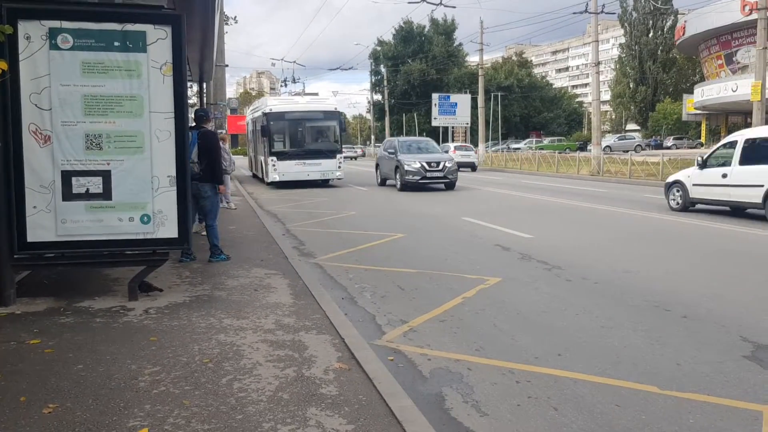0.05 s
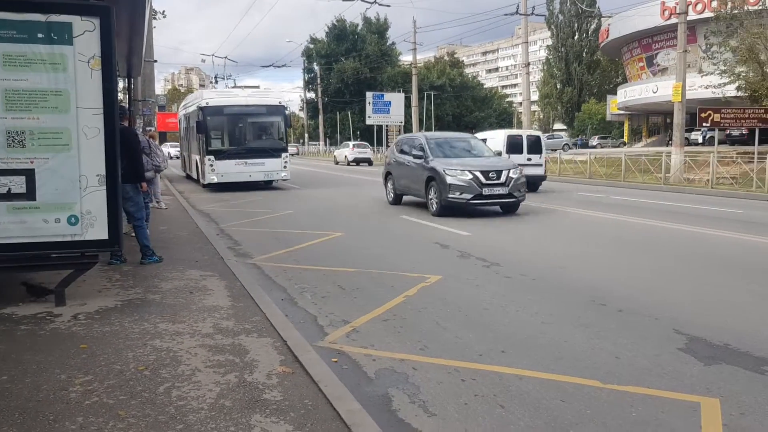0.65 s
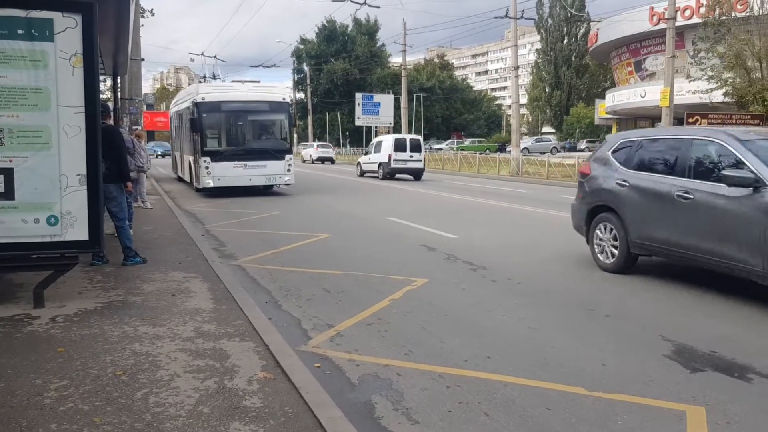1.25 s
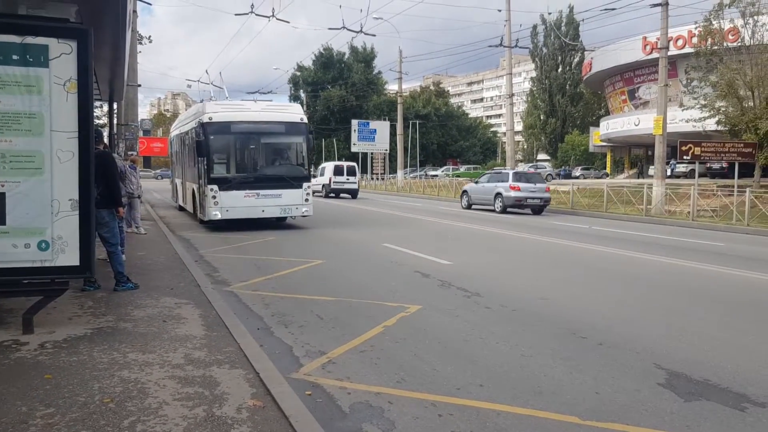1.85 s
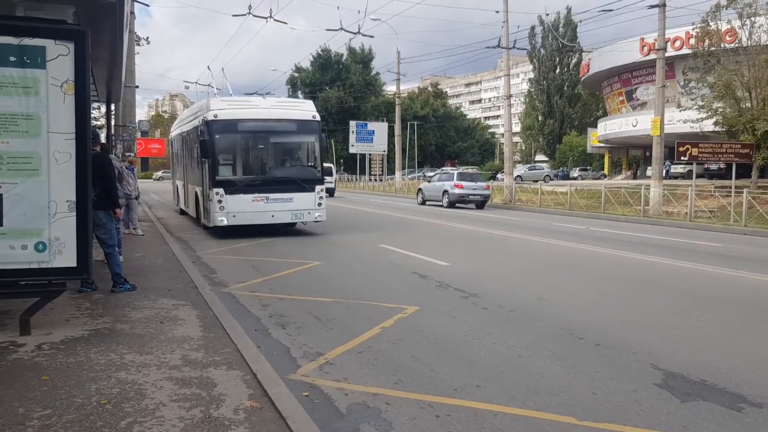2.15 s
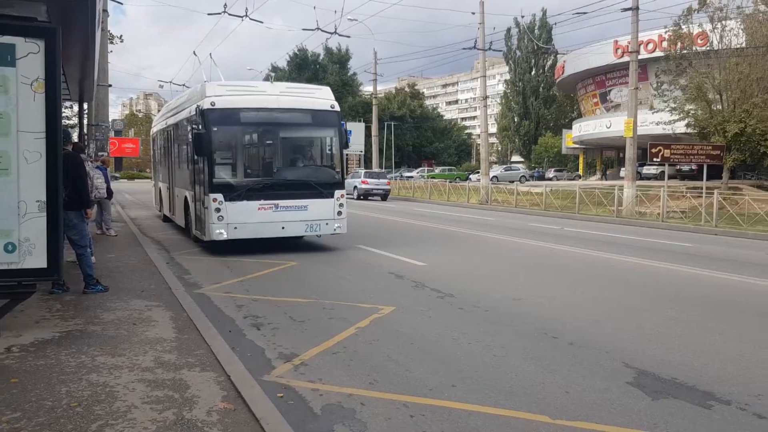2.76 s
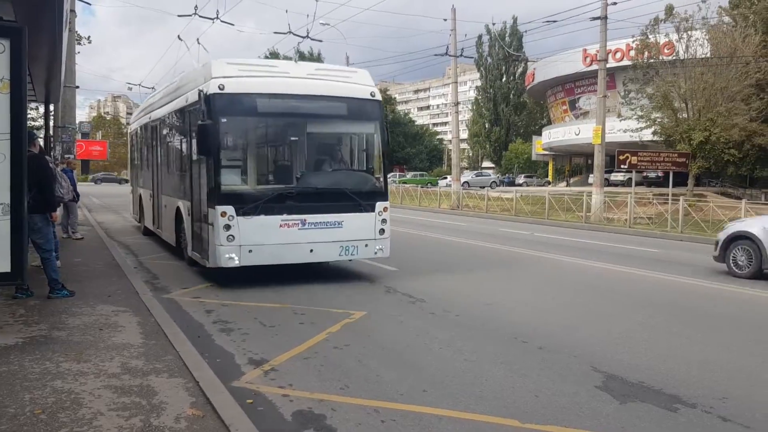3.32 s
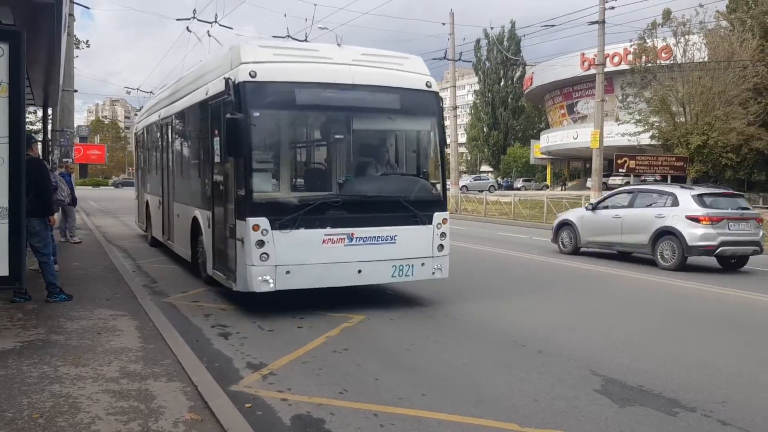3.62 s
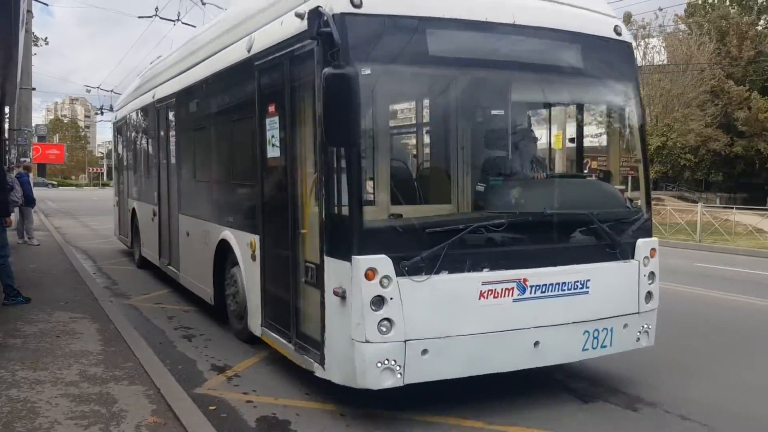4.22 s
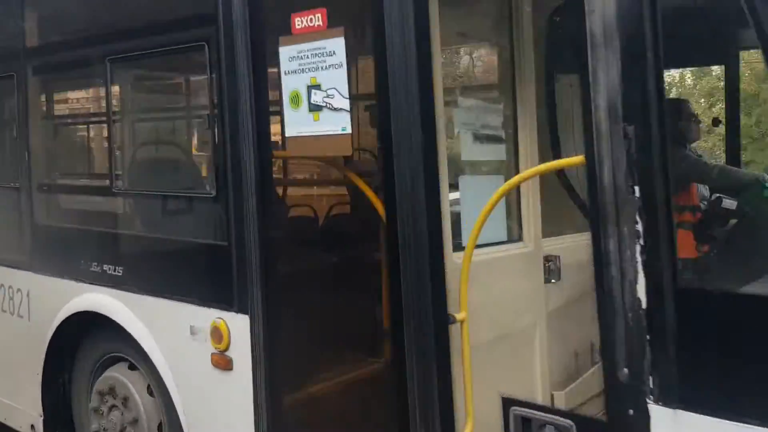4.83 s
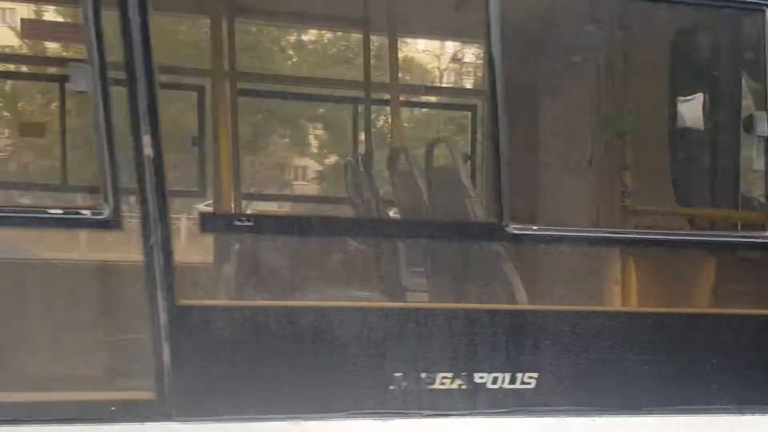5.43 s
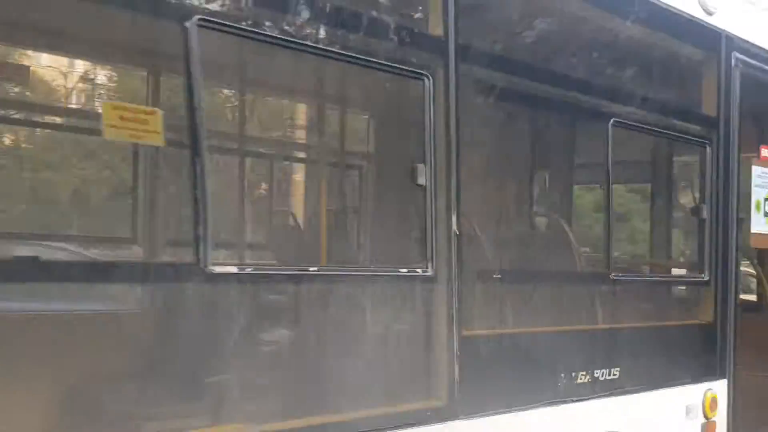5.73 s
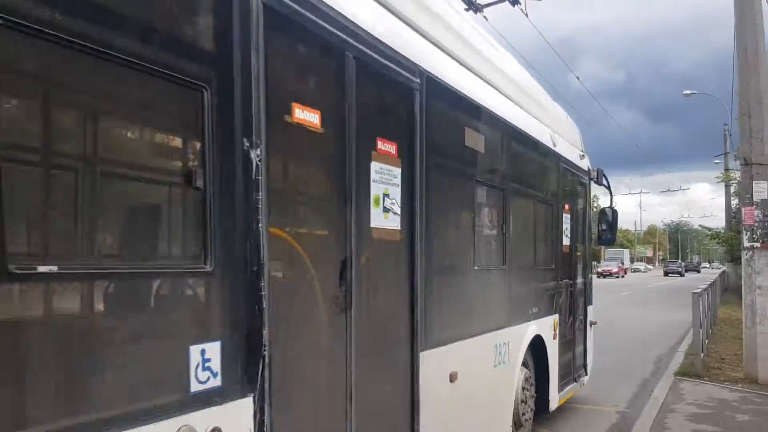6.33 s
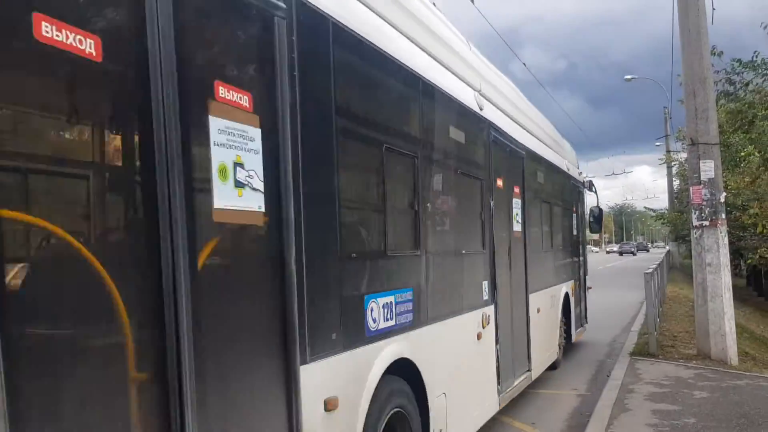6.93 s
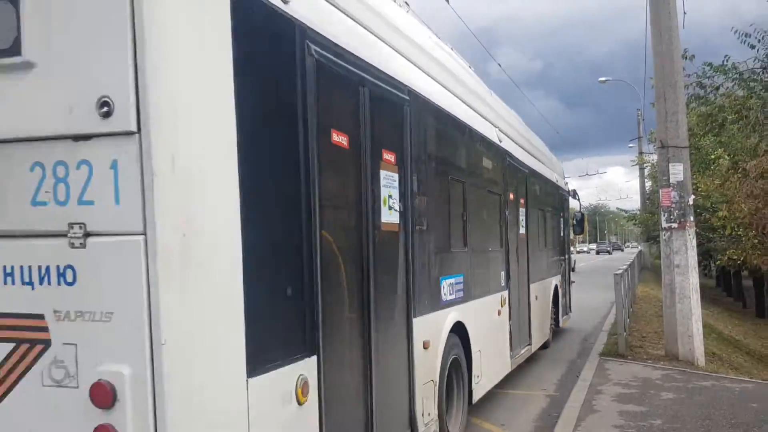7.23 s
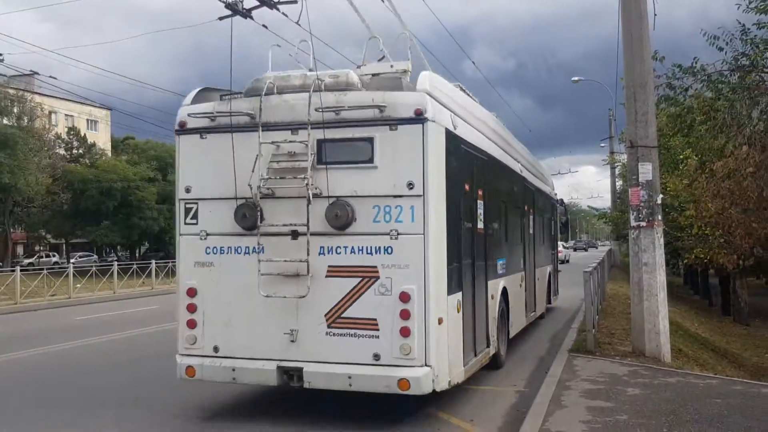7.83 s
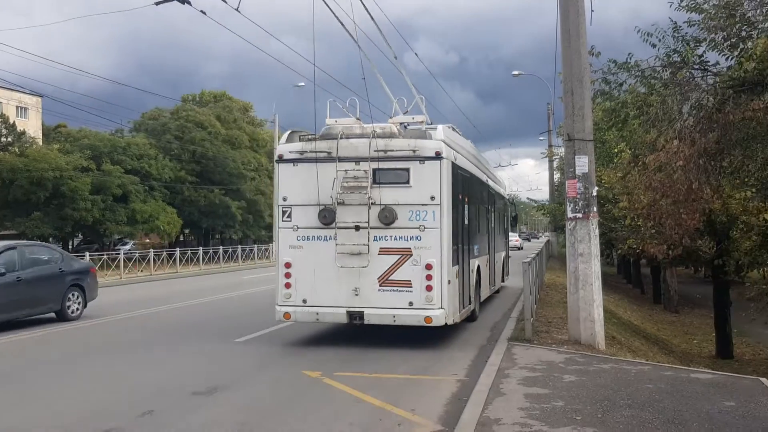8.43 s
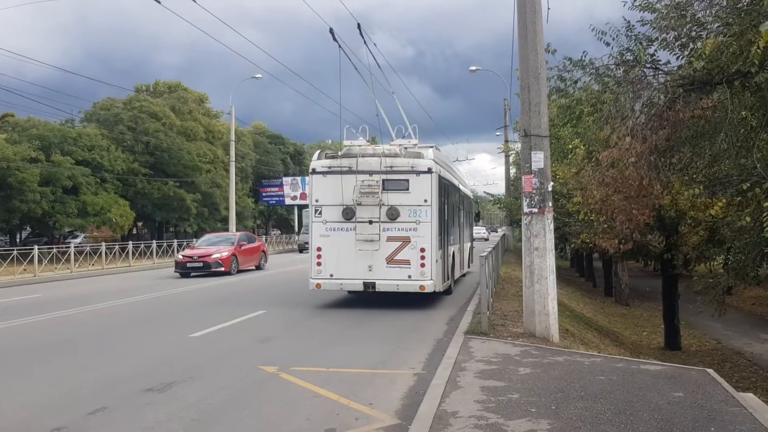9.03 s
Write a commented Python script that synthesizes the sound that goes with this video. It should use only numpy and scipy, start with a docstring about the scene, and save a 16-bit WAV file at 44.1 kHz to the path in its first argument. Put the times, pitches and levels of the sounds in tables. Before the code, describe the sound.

Busy street traffic swells and fades as a humming trolleybus passes close, its poles briefly scraping the overhead wire.

```python
"""Tyres roar and car engines drone on a busy city street; then a trolleybus rolls close by the kerb.
Tyre roar, hiss and rumble are coloured noise that swells with each pass; engines are fluttering notes.
The bus's drive hums upward; its converter whistle and fan drop in pitch as the rear goes by.
Collector shoes on the overhead wire chink as it nears and give a short crackling scrape near the end."""
import sys
import numpy as np
from scipy import signal
from scipy.fft import rfft, irfft
from scipy.io import wavfile
from scipy.ndimage import uniform_filter1d

SR = 44100
rng = np.random.default_rng(int(sys.argv[2]) if len(sys.argv) > 2 else 0)


def master(y):
    """Save y as 16-bit WAV."""
    cut = np.clip(np.atleast_2d(y).T, -1, 1)
    pcm = np.round(cut * 32767)  # scale
    wavfile.write(sys.argv[1], SR, pcm.astype(np.int16))


N = 404397
TIME_S = np.arange(N) / SR
FRAME_S = np.arange(N // 512 + 5) * 512 / SR
BIN_HZ = np.fft.rfftfreq(2048, 1 / SR)

# Car and bus tyres going by; width is distance over speed; boom, edge and song colour the roar:
# closest_s, width_s, roar_db, boom_db, edge_db, song_db, hiss_db
TYRE_PASSES = [(.28, 0.24, -38, 0, 2, -1.5, -52.5), (.92, 0.44, -40.5, -3.5, -2.5, 8, -47),
               (1.58, 0.22, -38, 7, 3.5, 0, -47.5), (2.1, 0.51, -44.5, -0.5, 13.5, -6, -50),
               (2.91, 0.23, -39.5, -3, 0.5, 5, -57), (3.44, 0.12, -38, -3.5, 0.5, 2.5, -57.5),
               (3.98, 0.43, -41, 0, 8, -4.5, -52), (4.48, 0.32, -37, 3, 2.5, 2.5, -44.5),
               (5.29, 0.25, -39, 4.5, 2.5, -5.5, -45.5), (6.09, 0.43, -44, 2.5, 5, -4.5, -48.5),
               (7.26, 0.36, -42, 4, 1.5, 1, -48.5), (7.85, 0.38, -42, -7, 3, -2.5, -54),
               (8.52, 0.23, -41, -6, -5, 3.5, -60), (8.97, 0.42, -39, 1.5, 0.5, 3.5, -50.5)]
# Band cancelled by the road reflection: time_s, centre_hz, depth_db
GROUND_DIP = [(0, 616, -1), (.9, 610, 2.5), (1.6, 649, 1), (5.3, 1420, 1), (6.2, 1501, 5.5),
              (8.2, 1540, 4.5), (9.17, 1600, 0)]
# Vehicles close enough to shake air and throw spray: closest_s, width_s, rumble_db, spray_db
CLOSE_PASSES = [(.85, 0.73, -35.5, -68), (1.7, 0.43, -40.5, -60.5), (4.5, 0.32, -41.5, -64),
                (5.2, 0.47, -30.5, -62.5), (6.6, 0.91, -36.5, -65), (9, 0.18, -40, -72)]
# Front and rear wheels of the closest car: closest_s, width_s, level_db
SWISHES = [(1.45, 0.16, -49.5), (1.76, 0.068, -46.5)]
# Passing engines: from_s, to_s, loudest_s, width_s, level_db, pitch_hz, glide_hz_per_s
ENGINE_NOTES = [(0, 1.3, 0.2, 0.2, -27, 153.2, 5), (1.35, 2.9, 2, 1.6, -44.5, 163.8, 5),
                (0, 2.33, 0.69, 0.93, -33.5, 59.03, 1.5), (0, 1.5, 0.55, 0.89, -39, 107, 1.2),
                (1.65, 2.2, 2.05, .3, -40.5, 96, 0), (6.85, 10.6, 7.62, 0.35, -32, 53.86, -4),
                (8.7, 10.6, 8.5, .4, -36, 55.5, -2)]
# Steady engine in the traffic: time_s, pitch_hz, level_db
ENGINE_DRONE = [(2.68, 66, -43), (2.8, 66.7, -34.5), (3.6, 64.9, -40), (4.6, 66.1, -37), (5, 67.8, -33),
                (5.9, 67.04, -37), (6.3, 64.3, -37), (6.8, 67.9, -43), (8.2, 63.2, -35.5),
                (9.17, 63.3, -40)]
# Thin tyre sizzle: closest_s, width_s, gain_db, centre_hz
SIZZLES = [(.85, 0.2, -58, 10300), (1.4, 0.11, -47.5, 14000), (1.72, 0.099, -55.5, 13600),
           (1.85, .08, -57, 9400)]
# Low air buffet: time_s, level_db
LOW_BUFFET = [(2.5, -65), (4, -49), (5.1, -57), (5.8, -43), (6.5, -41), (7.1, -53), (9.17, -38)]
# Bus drive hum: time_s, pitch_hz, level_db
DRIVE_HUM = [(3.6, 102.9, -41), (3.85, 104.8, -36), (4.08, 103.8, -32.5), (4.25, 93.1, -34),
             (4.7, 98.94, -33), (5.27, 102.7, -32), (5.34, 102.9, -23), (5.47, 102.2, -21.5),
             (5.66, 102.8, -42.5), (5.82, 106.4, -23), (5.98, 104.5, -22), (6.08, 106.1, -28),
             (6.31, 107.7, -22.5), (6.45, 107.7, -43)]
# Drive overtones when closest: multiple, level_db
DRIVE_OVERTONES = [(2, -34), (3, -42), (4, -50.5)]
# Gear whine and inverter: from_s, to_s, loudest_s, width_s, level_db, pitch_hz, glide_hz_per_s
WHIRRS = [(4.6, 5.5, 5.3, 0.27, -40, 416, 19), (3.7, 11, 4.8, 0.41, -63.5, 4165, -16)]
# Distant shoe knocks: peak_s, level_db, t60_s
CHINKS = [(3.838, -39, 0.023), (3.845, -39, .03), (3.89, -41, .25), (3.905, -34.5, 0.018),
          (3.912, -42, 0.38), (3.934, -43, .04)]
# Shoe scrapes: peak_s, level_db, t60_s
SCRAPES = [(8.538, -38, 0.16), (8.578, -36, 0.16), (8.616, -36, 0.48), (8.72, -54, 2.6)]
# Shoe ticks with a bright snap: peak_s, tick_db, snap_db, t60_s
TICKS = [(8.536, -30, -59, 0.015), (8.545, -31, -52, 0.033), (8.577, -35, -54, .018),
         (8.601, -28, -42, 0.04), (8.616, -27.5, -46, 0.026), (8.652, -35, -44, .025),
         (8.977, -40, -47, .008), (8.985, -30, -45, 0.008), (9.05, -55, -49, 0.0062)]

# Tread roar: freq_hz, density_db
ROAR_COLOUR = [(120, -7), (220, -2), (330, -4), (450, 0.5), (630, -4), (780, -0.5), (930, 0), (1200, -3),
               (1480, -4), (2000, -7.5), (2550, -16), (3100, -20), (3800, -34.5), (5000, -37)]
# Tyre hiss: freq_hz, density_db
HISS_COLOUR = [(2500, 1), (3600, -3), (4400, -2), (5200, 2), (6000, -3.5), (6800, -6), (7250, -15),
               (7650, -40)]
# Finest spray: freq_hz, density_db
SPRAY_COLOUR = [(7900, -47), (8500, -0.5), (9500, 2), (11200, 2), (13800, 2), (15800, -2.5)]
# Wheel swish: freq_hz, density_db
SWISH_COLOUR = [(3300, -4), (4550, 10.5), (5500, 6), (7700, -44)]
# Vehicle rumble: freq_hz, density_db
RUMBLE_COLOUR = [(20, -46), (33, -36), (45, -10), (62, 2), (85, 0), (125, -3.5), (190, -9.5), (260, -8),
                 (400, -13.5)]
# Air buffet: freq_hz, density_db
BUFFET_COLOUR = [(18, -10), (32, 2), (50, 13), (120, -9)]
# Distant knock: freq_hz, density_db
CHINK_COLOUR = [(2500, -7), (3200, -2), (3900, -12), (4550, -2), (4850, -5), (5450, 1.5), (6000, -10),
                (6900, -15), (7700, -35)]
# Street echoes, smeared between the whistle's coming and going pitch: freq_hz, density_db
ECHO_COLOUR = [(7700, -45), (7930, 0), (8190, -1), (8400, -45)]
# Cooling fan air: freq_hz, density_db
FAN_AIR_COLOUR = [(160, -24), (240, -2), (310, -7), (385, 2), (470, -22)]
# Shoe on the wire: freq_hz, density_db
SCRAPE_COLOUR = [(1500, -9), (2300, -1), (3200, -6), (4100, -7.5), (4700, -3.5), (5300, 6.5), (6200, -2),
                 (7200, -11.5), (7800, -46), (8800, -17), (12500, -17.5), (15700, -26)]
# Bright snap of a tick: freq_hz, density_db
SNAP_COLOUR = [(8500, -32), (10500, -14), (11800, -4), (13500, 0), (15700, -5)]

# Microphone pair balance: freq_hz, left_minus_right_db
MIC_BALANCE = [(60, 15), (110, 14.5), (200, 12.5), (380, -2.5), (700, -4.5), (1290, -9), (2380, -15.5),
               (4400, -24.5), (6300, -47), (9000, -31), (14000, -23)]
# Microphone pair likeness: freq_hz, coherence
MIC_COHERENCE = [(60, 1), (130, 0.88), (290, 1), (600, 0.47), (1200, 0.26), (2400, 0.43), (5000, 0.23)]

# The left microphone hears the road later until the pair swings round after the bus.
LAG_S, SWING_AT_S, SWING_S = .00047, 5.95, 0.23


def gain_of(db):
    """Decibels to amplitude."""
    return 10 ** (np.asarray(db) / 20)


def unit_rms(x):
    """Scale to rms 1."""
    return x / np.sqrt(np.mean(x ** 2) + 1e-20)


def at_hz(rows, hz):
    """Spectrum table, interpolated in log frequency."""
    freq_hz, value = np.transpose(rows)
    return np.interp(np.log(hz + 1), np.log(freq_hz + 1), value)


def at_time(rows, t_s):
    """Each column of a curve table at t_s."""
    time_s, *columns = np.transpose(rows)
    return [np.interp(t_s, time_s, column) for column in columns]


def drift(rate_hz):
    """Random wander of rms 1, up to about rate_hz."""
    hz = np.fft.rfftfreq(4096, TIME_S[-1] / 4096)
    slow = irfft(rfft(rng.standard_normal(4096)) / (1 + (hz / rate_hz) ** 4))
    return np.interp(TIME_S, np.linspace(0, TIME_S[-1], len(slow)), unit_rms(slow))


def bell(centre_hz, octaves):
    """Bell over frequency; one row a frame if the centre moves."""
    return np.exp(-.5 * (np.log2((BIN_HZ + 1) / np.asarray(centre_hz)[..., None]) / octaves) ** 2)


def gate(from_s, to_s, fade_s=0.1):
    """1 between two times, fading outside them."""
    return np.clip(1 + np.minimum(TIME_S - from_s, to_s - TIME_S) / fade_s, 0, 1)


def burst(peak_s, db, t60_s, rise_db_per_s=100004.0):
    """Power of a burst that climbs to a peak and decays."""
    below_db = np.maximum((peak_s - TIME_S) * rise_db_per_s, 60 * (TIME_S - peak_s) / t60_s)
    return gain_of(db - np.minimum(below_db, 150)) ** 2


def passing(t_s, closest_s, width_s):
    """Power (1 when closest) and heading (+1 coming, -1 going) of a passing source."""
    along = (closest_s - t_s) / width_s
    near = 1 / (1 + along ** 2)
    return near, along * np.sqrt(near)


def swells(rows, far_db=-120):
    """Amplitude of passes (closest_s, width_s, level_db) over a distant floor."""
    power = sum(gain_of(db) ** 2 * passing(TIME_S, s, width_s)[0] for s, width_s, db in rows)
    return np.sqrt(gain_of(far_db) ** 2 + power)


def mic_gains(hz):
    """Left and right gains: bass leans left, treble right."""
    lean = gain_of(at_hz(MIC_BALANCE, hz) / 2)
    cross = 2 * at_hz(MIC_COHERENCE, hz) * np.cos(2 * np.pi * hz * LAG_S)
    return 2 * np.array([lean, 1 / lean]) / np.sqrt(lean ** 2 + lean ** -2 + cross)


def noise(colour, field_db=0, patchy_db=0, band_hz=(0, SR)):
    """Stereo coloured noise, normalised in band_hz, then shaped by field_db and drifting patches."""
    a, b, c, d, patches = rng.standard_normal((5, len(FRAME_S), len(BIN_HZ)), dtype=np.float32)
    patches = unit_rms(uniform_filter1d(uniform_filter1d(patches, size=12, axis=0), size=14, axis=1))
    coherence = at_hz(MIC_COHERENCE, BIN_HZ)
    lag_s = LAG_S * np.tanh((SWING_AT_S - FRAME_S) / SWING_S)
    lead = np.exp(2j * np.pi * np.outer(lag_s, BIN_HZ).astype(np.float32))
    left = a + 1j * b
    right = coherence * lead * left + np.sqrt(1 - coherence ** 2) * (c + 1j * d)
    above_oct = np.maximum(np.log2((BIN_HZ + 1) / colour[-1][0]), 0)
    below_oct = np.maximum(np.log2(colour[0][0] / (BIN_HZ + 1)), 0)
    shape = gain_of(at_hz(colour, BIN_HZ) - 40 * (above_oct + below_oct))
    in_band = (BIN_HZ >= band_hz[0]) & (BIN_HZ <= band_hz[1])
    shape /= np.sqrt(np.sum(shape[in_band] ** 2) * 2 / 3)
    spectra = np.array([left, right])
    spectra *= mic_gains(BIN_HZ)[:, None] * (shape * gain_of(field_db + patchy_db * patches))
    return signal.istft(spectra.swapaxes(1, 2), nperseg=2048, noverlap=1536)[1][:, :N]


def tone(hz, db, flutter, wander_hz, rate_hz):
    """Machine note; changing paths over the road make it flutter and wander."""
    phasor = np.exp(2j * np.pi * np.cumsum(hz + wander_hz * drift(rate_hz)) / SR)
    paths = (1 + flutter * (drift(rate_hz) + 1j * drift(rate_hz))) / np.sqrt(.5 + flutter ** 2)
    return mic_gains(np.mean(hz))[:, None] * gain_of(db) * (paths * phasor).real


def passing_note(row, flutter, wander_hz, rate_hz):
    """Gliding note that swells and fades with distance."""
    from_s, to_s, loudest_s, width_s, db, hz, glide_hz_per_s = row
    pitch_hz = hz + glide_hz_per_s * (np.clip(TIME_S, from_s, to_s) - loudest_s)
    near, _ = passing(TIME_S, loudest_s, width_s)
    return gate(from_s, to_s) * np.sqrt(near) * tone(pitch_hz, db, flutter, wander_hz, rate_hz)


def tyre_roar(far_db=-64, song_hz=954, song_shift=0.06, song_ahead_db=-0.8):
    """Tread roar; the loudest wheels colour it with casing boom, tread edge and tread song."""
    closest_s, width_s, roar_db, boom_db, edge_db, song_db, _ = np.transpose(TYRE_PASSES)
    near, heading = passing(FRAME_S[:, None], closest_s, width_s)
    power = near * gain_of(roar_db) ** 2
    total = power.sum(1, keepdims=True) + gain_of(far_db) ** 2
    share = power / total
    ahead = (share * heading).sum(1)
    field_db = 10 * np.log10(total) + np.outer(share @ boom_db, bell(440, octaves=0.31))
    field_db += np.outer(share @ edge_db, bell(2140, octaves=0.59))
    # The tread resonance is higher and slightly weaker on approach.
    song_band = bell(song_hz * (1 + song_shift * ahead), octaves=.11)
    field_db += (share @ song_db + song_ahead_db * ahead)[:, None] * song_band
    dip_hz, dip_db = at_time(GROUND_DIP, FRAME_S)
    field_db -= dip_db[:, None] * bell(dip_hz, octaves=0.25)
    return noise(ROAR_COLOUR, field_db, patchy_db=0.7, band_hz=(780, 1150))


def tyre_hiss():
    """Hiss of every pass, fine spray from close ones, swish from the closest car's wheels."""
    hiss_rows = [(s, width_s, db) for s, width_s, *_, db in TYRE_PASSES]
    spray_rows = [(s, width_s, db) for s, width_s, _, db in CLOSE_PASSES]
    hiss = swells(hiss_rows, far_db=-83) * noise(HISS_COLOUR, patchy_db=1.52)
    spray = swells(spray_rows) * noise(SPRAY_COLOUR, patchy_db=1.7)
    return hiss + spray + swells(SWISHES) * noise(SWISH_COLOUR)


def engines():
    """Firing notes of passing cars, then a steady drone with its octave; close notes beat."""
    cars = sum(passing_note(row, flutter=0.12, wander_hz=0.44, rate_hz=4.3) for row in ENGINE_NOTES)
    hz, db = at_time(ENGINE_DRONE, TIME_S)
    firing = tone(hz, db, flutter=0.39, wander_hz=0.57, rate_hz=8.8)
    octave = tone(2 * hz, db - 15.5, flutter=1.0, wander_hz=1.4, rate_hz=9.7)
    return cars + gate(ENGINE_DRONE[0][0], TIME_S[-1]) * (firing + octave)


def rumble():
    """Air shaken by each close vehicle."""
    return swells([(s, width_s, db) for s, width_s, db, _ in CLOSE_PASSES]) * noise(RUMBLE_COLOUR)


def tyre_sizzle(shift=0.026):
    """Narrow hiss bands from the closest car, each sinking in pitch as it passes."""
    power = 1e-14
    for closest_s, width_s, db, hz in SIZZLES:
        near, heading = passing(FRAME_S, closest_s, width_s)
        band = bell(hz * (1 + shift * heading), octaves=0.22)
        power = power + (near * gain_of(db) ** 2)[:, None] * band ** 2
    return noise(SPRAY_COLOUR, 10 * np.log10(power), patchy_db=0.5)


def low_buffet():
    """Low air buffet that swells as the bus passes; low noise rises again toward the end."""
    return gain_of(at_time(LOW_BUFFET, TIME_S)[0]) * noise(BUFFET_COLOUR)


def bus_drive():
    """Hum that dips, then climbs as the bus gathers speed; overtones alongside; gear and inverter."""
    hz, db = at_time(DRIVE_HUM, TIME_S)
    near, _ = passing(TIME_S, closest_s=5.66, width_s=0.58)
    hum = tone(hz, db, flutter=0.13, wander_hz=0.35, rate_hz=9)
    for multiple, level_db in DRIVE_OVERTONES:
        hum += np.sqrt(near) * tone(multiple * hz, level_db, flutter=.35, wander_hz=.8, rate_hz=8)
    whirr = sum(passing_note(row, flutter=0.69, wander_hz=2.4, rate_hz=9.7) for row in WHIRRS)
    return gate(DRIVE_HUM[0][0], DRIVE_HUM[-1][0]) * hum + whirr


def shoe_chinks():
    """Short knocks of the collector shoes on the wire, still some way off."""
    power = sum(burst(*row, rise_db_per_s=3000) for row in CHINKS)
    return np.sqrt(power) * noise(CHINK_COLOUR)


def rear_pass(closest_s=6.52, distance_m=2.66, speed_m_per_s=6.0, sound_m_per_s=343):
    """Power, heading and Doppler ratio of the bus's rear, which carries converter and fan."""
    near, heading = passing(TIME_S, closest_s, distance_m / speed_m_per_s)
    return near, heading, 1 + heading * speed_m_per_s / sound_m_per_s


def converter(on_s=3.84, pitch_hz=8060, grille_db=-66, behind_db=2.5, scatter_db=-81, ahead_db=4.4):
    """Whistle from a side grille facing slightly back, plus street scatter and echoes."""
    near, heading, doppler = rear_pass()
    direct = gain_of(grille_db - behind_db * heading) * near
    scattered = gain_of(scatter_db + ahead_db * heading)
    whistle = (direct + scattered) * tone(pitch_hz * doppler, 0, flutter=.7, wander_hz=5, rate_hz=16)
    echo_power, _ = passing(TIME_S, closest_s=6.2, width_s=0.7)
    echoes = gain_of(-72) * np.sqrt(echo_power) * noise(ECHO_COLOUR)
    return gate(on_s, TIME_S[-1], fade_s=.4) * (whistle + echoes)


def cooling_fan(blade_hz=359.8, blade_db=-42, air_db=-41, behind_db=7.5):
    """Blade tone and rushing air, thrown backward; the tone drops as the rear passes."""
    near, heading, doppler = rear_pass()
    blades = tone(blade_hz * doppler, blade_db, flutter=0.47, wander_hz=3.08, rate_hz=10.7)
    air = gain_of(air_db) * noise(FAN_AIR_COLOUR)
    return np.sqrt(near) * gain_of(-behind_db * heading) * (near ** 0.31 * blades + air)


def shoe_scrape(wire_hz=5550, wire_db=2):
    """Gritty scrapes and sharp ticks of the collector shoes; the wire rings under them."""
    scrapes = sum(burst(*row, rise_db_per_s=800) for row in SCRAPES)
    grit = gain_of(2.0 * drift(150)) ** 2
    ticks = sum(burst(s, db, t60_s, rise_db_per_s=12000) for s, db, _, t60_s in TICKS)
    snaps = sum(burst(s, db, t60_s) for s, _, db, t60_s in TICKS)
    ring_db = wire_db * (bell(wire_hz, octaves=.17) - .5)
    contact = np.sqrt(scrapes * grit + ticks) * noise(SCRAPE_COLOUR, ring_db)
    return contact + np.sqrt(snaps) * noise(SNAP_COLOUR)


def scene():
    """Traffic plus trolleybus, in stereo."""
    street = tyre_roar() + tyre_hiss() + engines() + rumble() + tyre_sizzle() + low_buffet()
    bus = bus_drive() + shoe_chinks() + converter() + cooling_fan() + shoe_scrape()
    return street + bus


def record(dry):
    """Steep low-pass band limit."""
    edge_hz = 15750
    lowpass = signal.firwin(511, edge_hz, window=("kaiser", 9), fs=SR)
    return signal.oaconvolve(dry, lowpass[None], "same")


dry = scene()
out = record(dry)
master(out)
```